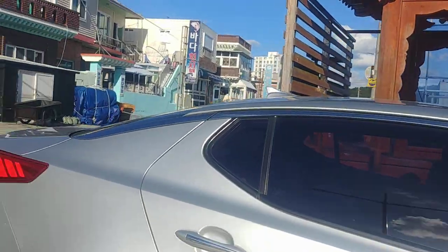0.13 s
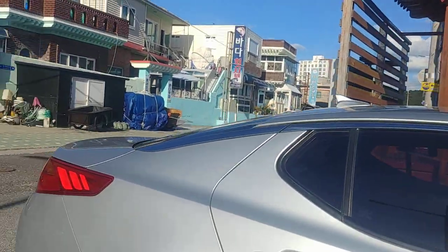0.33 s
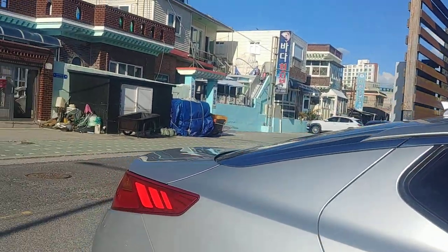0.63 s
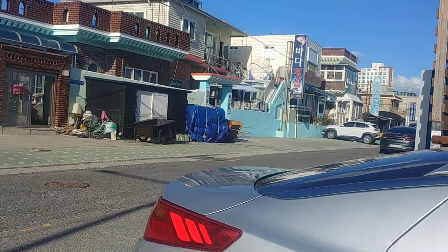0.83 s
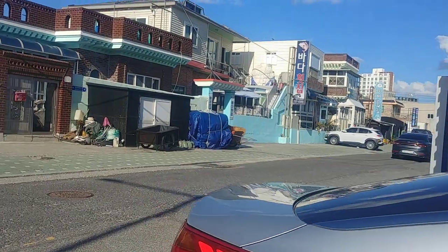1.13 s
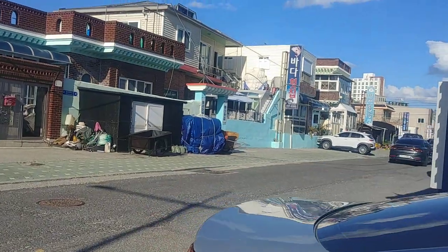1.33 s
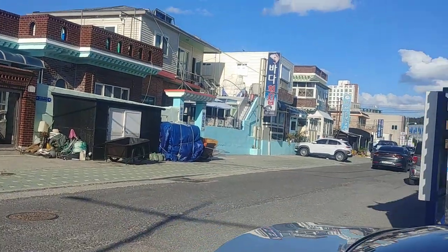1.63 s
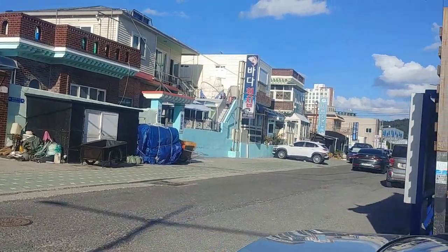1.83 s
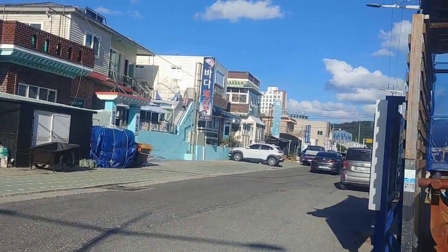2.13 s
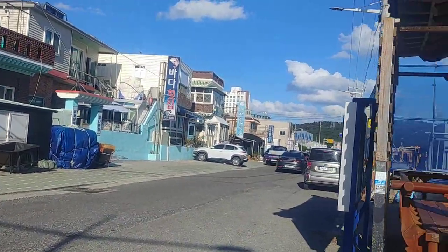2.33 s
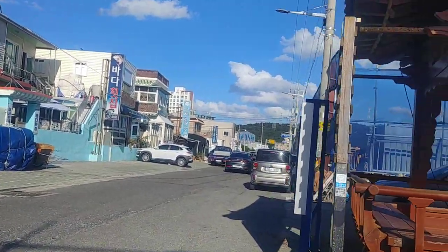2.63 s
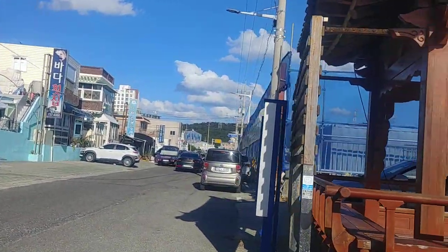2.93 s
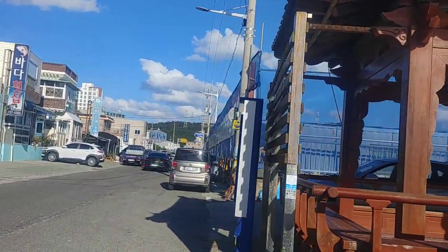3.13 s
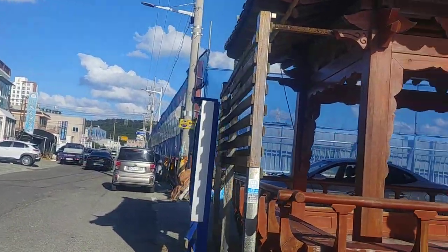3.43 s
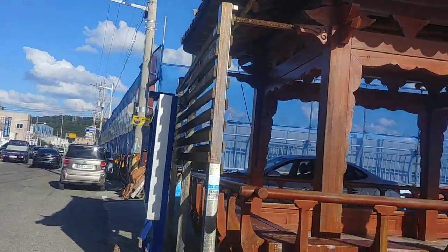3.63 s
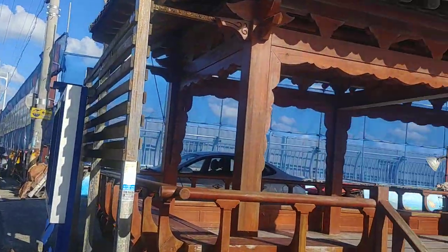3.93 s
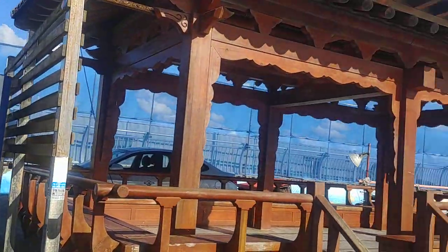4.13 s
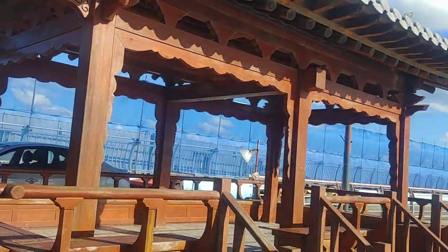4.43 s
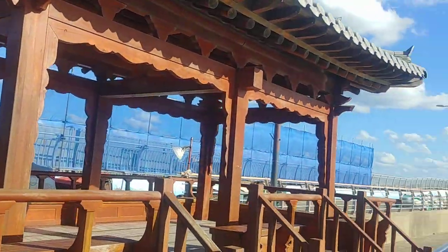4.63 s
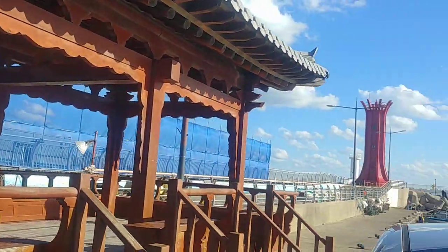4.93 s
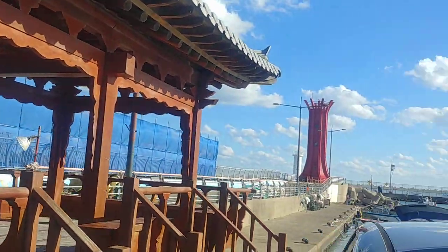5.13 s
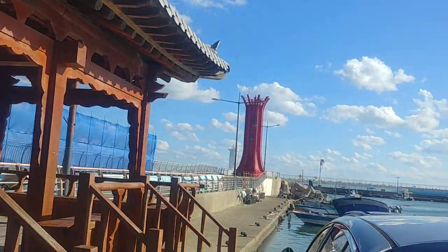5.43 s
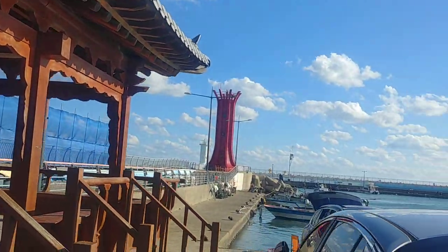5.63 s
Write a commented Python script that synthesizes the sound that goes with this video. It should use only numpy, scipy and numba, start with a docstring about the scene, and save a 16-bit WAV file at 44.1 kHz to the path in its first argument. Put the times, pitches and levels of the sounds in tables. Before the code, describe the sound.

Someone walks outside by the water holding a phone in strong wind. Uneven gusts press directly on the microphones, giving a dense, squashed low rumble with brief flaps and clicks. Barely audible scuffing steps and tiny high sizzles come and go. In the second half the right side grows rougher and brighter, crackling, against a darker rumble on the left, continuing to the end.

```python
"""Gusty harbour wind blows across the two microphone ports of a hand-held phone while its owner walks.
From the start, eddies rumble at both ports (noise under a moving low-pass) beneath gusts and short buffets;
shoe scuffs and a thin sizzle (noise bursts) come and go over the hiss of the open air (shaped noise).
Vortices soon snap too (filtered pulses). After 3 s the right port turns into the wind: faster air roars
higher, and it tears and crackles. A fast limiter holds the peaks throughout."""
import sys
import numpy as np
from scipy import signal
from scipy.fft import rfft, irfft, next_fast_len
from scipy.io import wavfile
from scipy.ndimage import uniform_filter1d, minimum_filter1d
from numba import njit

SR = 44100
rng = np.random.default_rng(int(sys.argv[2]) if len(sys.argv) > 2 else 0)


def wav_record(signal):
    """Record a signal, one row per channel, as 16-bit PCM in the file named by sys.argv[1]."""
    frames = np.transpose(np.atleast_2d(signal))
    bounded = np.clip(frames, -1, 1)
    # unit amplitude maps onto the largest positive 16-bit level
    quanta = np.round(bounded * 32767).astype(np.int16)
    wavfile.write(sys.argv[1], SR, quanta)


N = 254898
TIME = np.arange(N) / SR   # s

# Hiss of the open air, before its gain and the colour of the ports: [t/s, level/dB]
AIR_LEVEL = [(0, -79), (.7, -76), (.9, -85), (1.5, -75.5), (1.9, -82), (2.35, -84), (2.9, -78), (3.15, -71),
             (3.6, -68.5), (4.15, -72), (5.78, -70)]
# Shoe scuffs on the road, before their gain and the colour of the ports: [t/s, length/s, level/dB]
SHOE_SCUFFS = [(.52, 0.046, -55), (1.157, .007, -56), (1.374, .014, -49.5), (1.413, 0.033, -55.5),
               (1.788, 0.011, -50.5), (1.995, 0.11, -58), (2.514, .012, -40), (3.05, 0.028, -48),
               (3.305, 0.12, -53), (3.449, .06, -41.5), (4.714, 0.099, -51), (4.889, 0.049, -43.5),
               (5.2, 0.11, -52.5), (5.465, 0.071, -50), (5.64, 0.069, -50)]
# Colour of outside sound through each port: [f/Hz, level/dB per Hz]
OUTSIDE_COLOUR_LEFT = [(200, -21.5), (1000, -19.5), (2000, -27.5), (4000, -30.5), (6100, -30.5),
                       (7000, -44), (8200, -42), (10500, -64), (15000, -52.5)]
OUTSIDE_COLOUR_RIGHT = [(200, -26.5), (1000, -25), (2000, -34), (4000, -38.5), (6000, -41), (7000, -49),
                        (8000, -37), (9000, -48.5), (10000, -62), (15000, -64)]
# Thin, very high sizzle, before its gain and colour: [t/s, length/s, level/dB]
SIZZLE_BURSTS = [(.11, .03, -78), (.75, .03, -72), (1.39, .18, -71.5), (3.46, .039, -73), (4.77, .045, -79),
                 (5.22, .054, -80)]
# Colour of the sizzle: [f/Hz, level/dB per Hz]
SIZZLE_SPECTRUM = [(5000, -63.5), (7000, -47), (8100, -22.5), (9300, -36.5), (11000, -50.5), (13000, -43.5),
                   (14000, -35.5), (15200, -26.5), (16000, -41.5)]

# Loudest vortices snapping at a port, before the port's snap gain: [t/s, port, peak level/dB]
LOUD_SNAPS = [(.822, "L", -15), (0.986, "R", -9), (1.842, "R", -8), (2.066, "L", -7), (2.231, "R", -5),
              (2.547, "R", -6.5), (2.583, "R", -1), (2.601, "R", -3), (2.609, "R", -1), (2.875, "R", -8),
              (3.102, "R", 4), (3.295, "R", 2), (3.762, "R", -4.5), (3.878, "R", 1), (3.894, "R", -6),
              (4.366, "R", -1), (4.387, "R", -5.5), (4.422, "R", -1), (4.788, "R", 3), (5.066, "R", -10)]
# Lesser snaps come at random: their rate in the fastest air, and the eddy corner that gives half of it
MAX_SNAPS_PER_S, HALF_RATE_CORNER_HZ = 24, 900
# Their level over the wind's pressure, before the port's snap gain, and its scatter
SNAP_OVER_FLOW_DB, SNAP_SPREAD_DB = -2.5, 5

# Eddy pressure through each port, before flow level and roll-off: [f/Hz, level/dB per Hz]
EDDY_SPECTRUM_LEFT = [(20, -35), (45, -33), (63, -22.5), (88, -21.5), (140, -25.5), (300, -29.5),
                      (700, -28.5), (1500, -36.5), (4000, -47.5), (8000, -37), (12000, -47.5)]
EDDY_SPECTRUM_RIGHT = [(20, -36.5), (45, -28), (63, -20), (88, -22), (140, -24), (300, -29), (1000, -32),
                       (2900, -35.5), (4500, -40.5), (6900, -45), (8000, -37.5), (10000, -62),
                       (16000, -64.5)]
# Steady wind under the gusts; the right port turns into it after 3 s:
# [t/s, left pressure level/dB, left eddy corner f/Hz, right pressure level/dB, right eddy corner f/Hz]
STEADY_WIND = [(0.0, -16.5, 190.0, -24, 336), (0.71, -16, 250.0, -17.5, 269),
               (1.4, -19.8, 280.0, -16.5, 262), (1.98, -16.5, 250.0, -22, 291),
               (2.26, -20, 370.0, -16.5, 331.6), (2.81, -18, 280.0, -20, 388),
               (3.11, -21.5, 250.0, -17, 547), (3.44, -11.5, 220.0, -14.5, 302),
               (3.7, -12.5, 360.0, -12.5, 873), (4.09, -11.5, 240.0, -13, 1180),
               (4.31, -9, 300.0, -11, 866), (4.64, -7, 240.0, -11, 1745), (4.89, -15, 200.0, -7, 690),
               (4.91, -13, 230.0, -6, 1330.0), (5.2, -12.5, 210.0, -12.5, 1004),
               (5.24, -7.5, 190.0, -11, 1600), (5.78, -6, 150.0, -10, 1030)]
# Gusts over both ports, added to the steady wind: [middle t/s, length/s, left level/dB, right level/dB]
WIND_GUSTS = [(0.042, 0.17, 7.5, 13), (0.434, 0.37, 8, 11), (0.756, 0.21, 12, 11),
              (0.913, 0.035, 1.5, 11.5), (1.047, 0.14, 7, 11.5), (1.236, 0.15, 12, 11),
              (1.53, 0.2, 12.5, 9), (1.777, 0.16, 7, 13), (2.075, 0.16, 0, 12), (2.45, 0.05, -3, 3),
              (2.55, 0.21, 16, 3), (2.977, 0.23, 15, 5.5), (3.245, 0.12, 8, 1), (3.5, 0.33, 6, -3.5),
              (3.801, 0.018, 8.5, 2.5), (4.09, 0.2, 6.5, 4), (4.584, 0.087, 2.5, 2),
              (4.879, 0.15, 11.5, -4.5), (5.044, 0.073, 9.5, 0), (5.415, 0.078, 5.5, 4),
              (5.75, 0.13, 3.5, 2)]
# Buffets, where the flow tears loose at one port:
# [middle t/s, length/s, port, rise of the eddy corner/octaves, extra pressure level/dB]
PORT_BUFFETS = [(.017, .039, "R", 1.28, .5), (0.046, 0.067, "L", 1.34, 3), (0.082, 0.045, "R", 1.35, 6),
                (0.35, 0.03, "L", 0.83, 6), (0.572, .089, "R", 1.26, 3), (0.983, 0.024, "R", 1.35, 1.5),
                (1.092, 0.06, "R", 1.31, -7.5), (1.258, 0.017, "L", 0.48, 9), (1.428, 0.017, "L", 1.2, 7.5),
                (1.542, 0.041, "R", 1.11, 3), (1.597, 0.023, "L", 1.06, 5.5), (1.62, 0.049, "R", 1.7, 8.5),
                (1.681, .01, "R", 1.94, 10.5), (1.834, 0.03, "R", 1.55, 4), (2.071, 0.022, "L", 2.45, 10.5),
                (2.079, .017, "R", 1.56, 1), (2.123, 0.068, "L", 1.3, 3.5), (2.123, .051, "R", 1.9, -0.5),
                (2.221, 0.036, "R", 2.76, 8), (2.283, 0.041, "R", 0.84, 2.5), (2.411, 0.034, "R", 0.68, 5),
                (2.526, 0.085, "R", 1.72, 5), (2.597, 0.038, "R", 2.0, 8), (2.697, 0.045, "R", 2.1, -6.5),
                (2.876, 0.026, "R", 1.8, 4), (3.056, 0.15, "R", 1.47, 0.5), (3.154, 0.088, "R", 2.16, 2),
                (3.328, 0.12, "R", 2.78, 5), (3.474, 0.031, "L", 1.3, 0.5), (3.536, 0.18, "R", 2.18, 5),
                (3.691, .013, "R", 1.03, 8), (3.832, 0.034, "R", 2.32, 2.5), (3.954, 0.02, "R", 1.25, 0.5),
                (4.201, 0.12, "R", 0.76, -1)]
GUST_OCTAVES_PER_DB = 0.0244   # a stronger gust is also brighter
SURGE_STEEPNESS = 3.1   # shape of gusts and buffets: 2 is a bell, more is a plateau


def from_db(db):
    """Decibel law: amplitude is ten to the power of level over 20."""
    return 10 ** (np.asarray(db) / 20)


def in_time(rows):
    """Linear interpolation: each column of a curve is joined by straight lines in time."""
    times, *columns = np.transpose(rows)
    return [np.interp(TIME, times, column) for column in columns]


def drift(rate_hz):
    """Random modulation: noise smoothed by two equal poles at the given rate, scaled to unit spread."""
    pole = np.exp(-2 * np.pi * rate_hz / SR)
    white = rng.standard_normal(N + SR)
    slow = signal.lfilter([1], [1, -2 * pole, pole * pole], white)[SR:]   # the first second settles
    return slow / slow.std()


def noise(spectrum):
    """Spectral shaping: white noise is weighted to a given density per Hz."""
    size = next_fast_len(N)
    hz, level_db = np.transpose(spectrum)
    bins_hz = np.maximum(np.fft.rfftfreq(size, 1 / SR), 1)
    gain = from_db(np.interp(np.log(bins_hz), np.log(hz), level_db))
    shaped = irfft(rfft(rng.standard_normal(size)) * gain, size)[:N]
    return shaped * np.sqrt(SR / 2)   # white noise spreads its power over SR / 2


def strokes(rows, attack_s, release_s, grit_db):
    """Friction: a rubbing contact rises quickly, slides with a grainy level, then dies exponentially."""
    level = np.zeros(N)
    for start_s, length_s, stroke_db in rows:
        rise = np.clip((TIME - start_s) / attack_s + 1, 0, 1)
        fall = np.exp(-np.clip((TIME - start_s - length_s) / release_s, 0, 20))
        level += from_db(stroke_db) * rise * fall
    return level * from_db(grit_db * drift(150))


@njit
def two_pole(x, g, damping):
    """State-variable low-pass: two integrators in a loop, whose corner moves with every sample."""
    out, band, low = np.empty_like(x), 0., 0.
    for i in range(len(x)):
        v = (band + g[i] * (x[i] - low)) / (1 + g[i] * (g[i] + damping))
        out[i] = low + g[i] * v
        band, low = 2 * v - band, 2 * out[i] - low
    return out


def roll_off(x, corner_hz, damping):
    """Second-order decay of the spectrum above a moving corner."""
    return two_pole(x, np.tan(np.pi * np.minimum(corner_hz / SR, .4)), damping)


def outside(air_gain_db, scuff_gain_db, sizzle_gain_db):
    """Superposition of powers: open air and footsteps share each port's noise; a thin sizzle adds to it."""
    air = from_db(in_time(AIR_LEVEL)[0] + air_gain_db + 1.9 * drift(25))
    steps = from_db(scuff_gain_db) * strokes(SHOE_SCUFFS, attack_s=0.0045, release_s=0.0031, grit_db=2.5)
    sizzle = from_db(sizzle_gain_db) * strokes(SIZZLE_BURSTS, attack_s=.015, release_s=0.017, grit_db=5.0)
    port_noise = np.array([noise(OUTSIDE_COLOUR_LEFT), noise(OUTSIDE_COLOUR_RIGHT)])
    sizzle_noise = np.array([from_db(-5.5) * noise(SIZZLE_SPECTRUM), noise(SIZZLE_SPECTRUM)])
    return np.hypot(air, steps) * port_noise + sizzle * sizzle_noise


def vortices(port, pressure_db, corner_hz):
    """Vortex shedding: a pulse for each loud vortex, and a random scatter that thickens in fast air."""
    shedding = 1 / (1 + (HALF_RATE_CORNER_HZ / corner_hz) ** 6)
    born = rng.random(N) < MAX_SNAPS_PER_S * shedding / SR
    scatter_db = SNAP_SPREAD_DB * rng.standard_normal(N)
    pulses = born * from_db(pressure_db + SNAP_OVER_FLOW_DB + scatter_db)
    for snap_s, where, peak_db in LOUD_SNAPS:
        if where == port:
            pulses[round(snap_s * SR)] = from_db(peak_db)
    return pulses


def snaps(pulses, edge_hz, relax_hz, port_hz, port_q, port_db, gain_db):
    """Impulse response: a vortex pulls the pressure down, it leaks back, and the port's cavity rings."""
    shape = signal.lfilter(*signal.butter(1, relax_hz, fs=SR), signal.unit_impulse(512))
    shape = signal.lfilter(*signal.butter(2, edge_hz, fs=SR), shape)   # rounds the edge
    shape = signal.lfilter(*signal.butter(1, relax_hz / 2, "high", fs=SR), shape)
    ringing = signal.lfilter(*signal.iirpeak(port_hz, port_q, fs=SR), shape)
    shape = shape + from_db(port_db) * ringing
    return -from_db(gain_db) * signal.oaconvolve(pulses, shape / abs(shape).max())[:N]


def surge(middle_s, length_s):
    """Transient envelope: a smooth swell to 1 and back, above one half for its length."""
    distance = np.minimum(abs(2 * (TIME - middle_s) / length_s), 4)
    return 2 ** -(distance ** SURGE_STEEPNESS)


def airflow(port):
    """Mean flow plus fluctuation: gusts and buffets add to a port's pressure (dB) and eddy corner (Hz)."""
    left_db, left_hz, right_db, right_hz = in_time(STEADY_WIND)
    pressure_db, corner_hz = (left_db, left_hz) if port == "L" else (right_db, right_hz)
    gust_db = np.zeros(N)
    for middle_s, length_s, gust_left_db, gust_right_db in WIND_GUSTS:
        gust_db += (gust_left_db if port == "L" else gust_right_db) * surge(middle_s, length_s)
    octaves = GUST_OCTAVES_PER_DB * gust_db
    for middle_s, length_s, where, rise_octaves, extra_db in PORT_BUFFETS:
        if where == port:
            shape = surge(middle_s, length_s)
            octaves += rise_octaves * shape
            gust_db += extra_db * shape
    return pressure_db + gust_db, corner_hz * 2 ** octaves


def wind(pressure_db, corner_hz, eddies, flutter_octaves, flutter_hz, tear_octaves, tear_hz, lump_db):
    """Turbulence: the air speed sets how small an eddy still presses on the membrane."""
    unrest = corner_hz / (corner_hz + 300)   # slow air rolls smoothly, fast air flaps and tears
    octaves = unrest * (flutter_octaves * drift(flutter_hz) + tear_octaves * drift(tear_hz))
    corner_hz = corner_hz * 2 ** np.tanh(octaves)   # the corner strays by less than an octave
    pressure = noise(eddies)
    swell = np.sqrt(uniform_filter1d(pressure ** 2, size=2200))   # 50 ms
    pressure *= pressure.std() / swell   # the flow, not chance, sets the strength of the rumble
    pressure = pressure * from_db(pressure_db + lump_db * drift(24.5))
    pressure = roll_off(pressure, 1.063 * corner_hz, damping=1.215)   # the smallest eddies die out
    return roll_off(pressure, 1.274 * corner_hz, damping=2.317)


def scene():
    """Superposition: each port's own turbulence and snaps add to the outside sound."""
    left_air, right_air = airflow("L"), airflow("R")
    # the air flaps slowly (flutter) and tears fast; lumps are swings of its level
    left = wind(*left_air, EDDY_SPECTRUM_LEFT, flutter_octaves=0.54, flutter_hz=35,
                tear_octaves=0.42, tear_hz=240, lump_db=2.0)
    right = wind(*right_air, EDDY_SPECTRUM_RIGHT, flutter_octaves=.24, flutter_hz=60,
                 tear_octaves=0.62, tear_hz=200, lump_db=4.0)
    left += snaps(vortices("L", *left_air), edge_hz=1800, relax_hz=593,
                  port_hz=6000, port_q=3, port_db=-6.5, gain_db=3.0)
    right += snaps(vortices("R", *right_air), edge_hz=2050, relax_hz=800,
                   port_hz=7950, port_q=6, port_db=-5.5, gain_db=0.5)
    return np.array([left, right]) + outside(air_gain_db=7.0, scuff_gain_db=-6.0, sizzle_gain_db=2.0)


def record(dry):
    """Band and peak limiting: a low cut, a fast limiter on each channel, clipping, and a cut top."""
    low_cut = signal.butter(4, 64, "high", fs=SR, output="sos")   # Hz
    x = signal.sosfilt(low_cut, dry)
    ceiling, size = 1.01, 120   # full scale = 1; samples
    gain = minimum_filter1d(ceiling / np.maximum(abs(x), ceiling), size)
    gain = uniform_filter1d(gain, size)
    clipped = np.clip(x * gain, -1, 1)   # what still overshoots
    top_cut = signal.cheby2(12, 60, 16748, fs=SR, output="sos")   # 60 dB down from 16748 Hz up
    return signal.sosfilt(top_cut, clipped)


dry = scene()
out = record(dry)
wav_record(out)
```